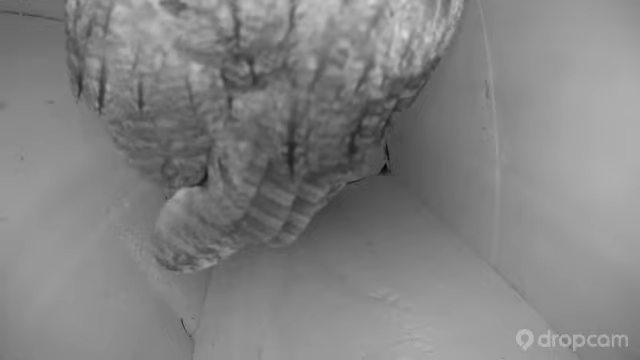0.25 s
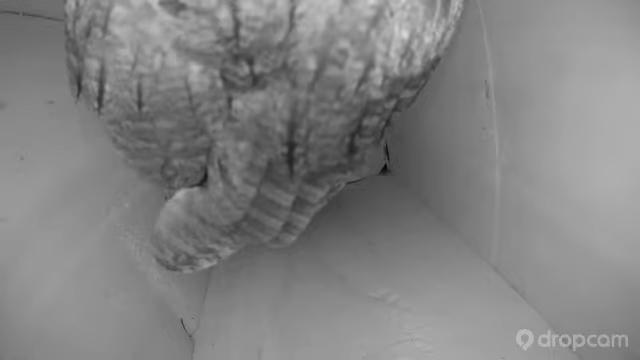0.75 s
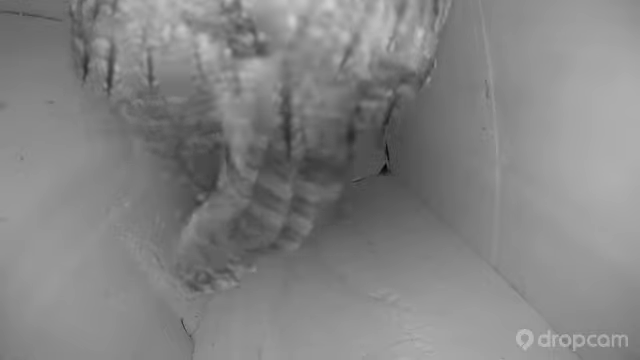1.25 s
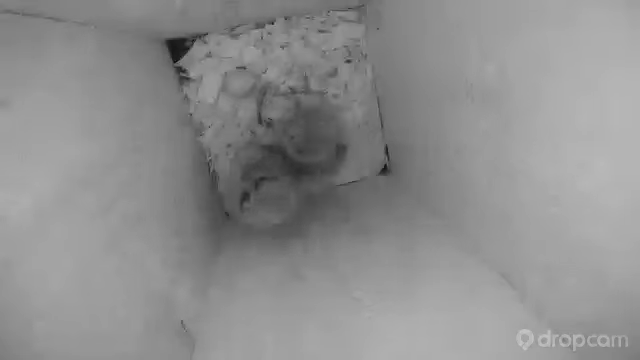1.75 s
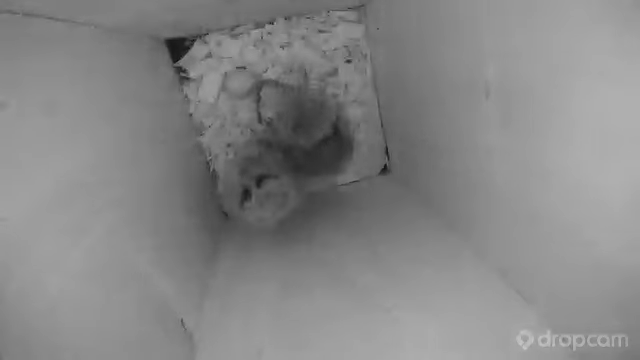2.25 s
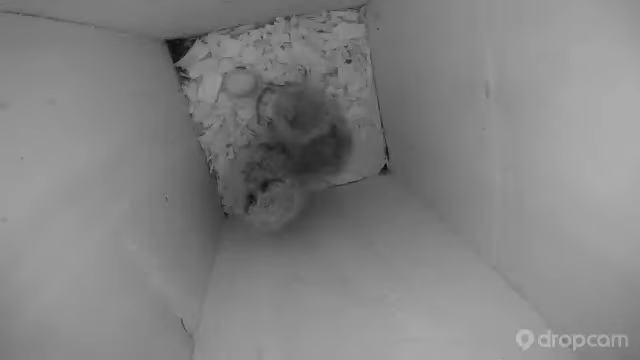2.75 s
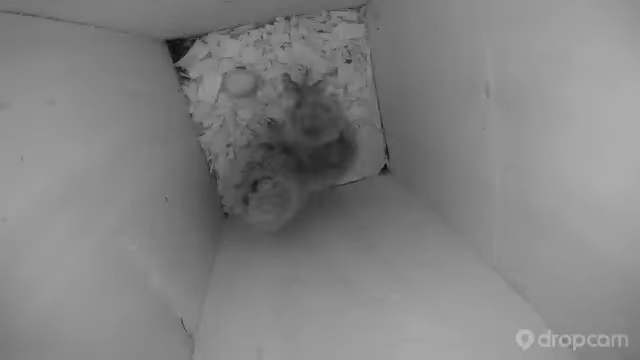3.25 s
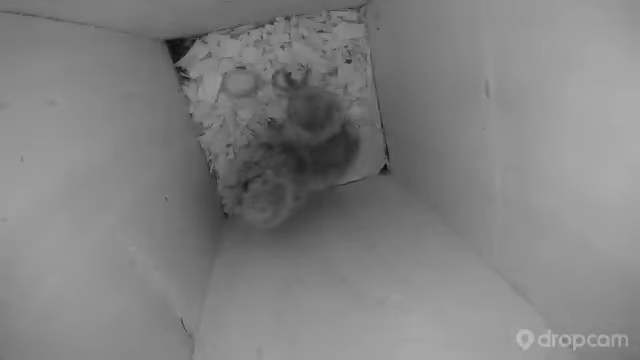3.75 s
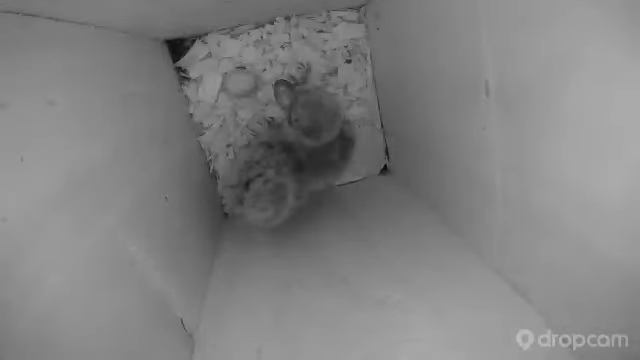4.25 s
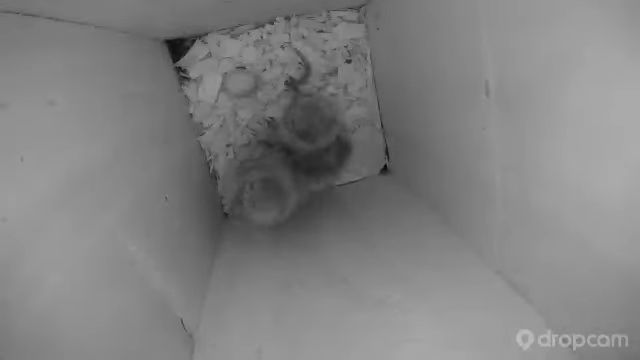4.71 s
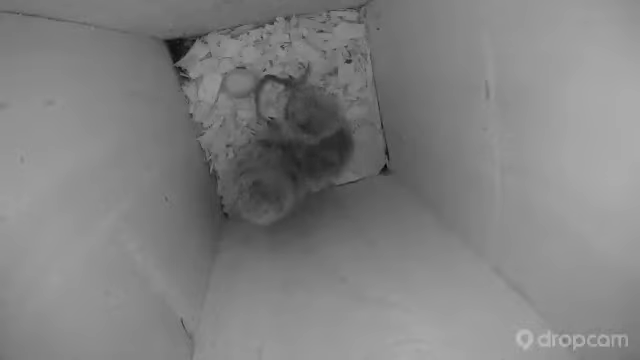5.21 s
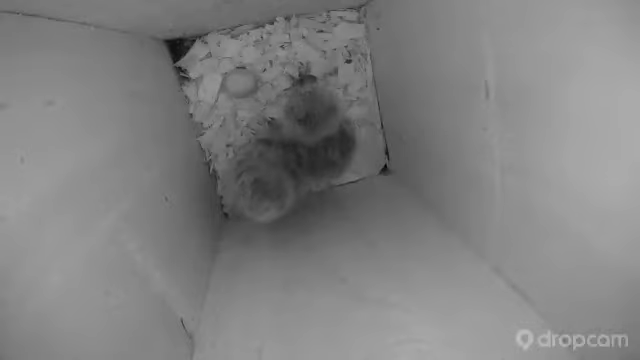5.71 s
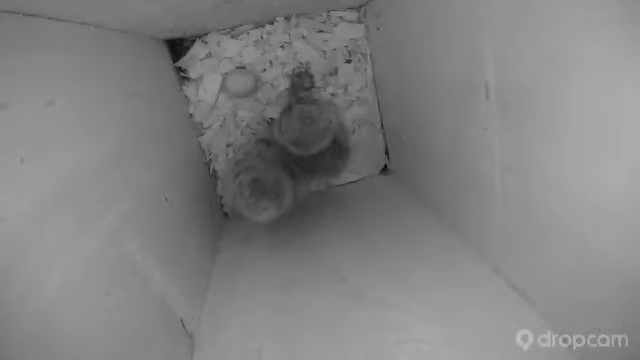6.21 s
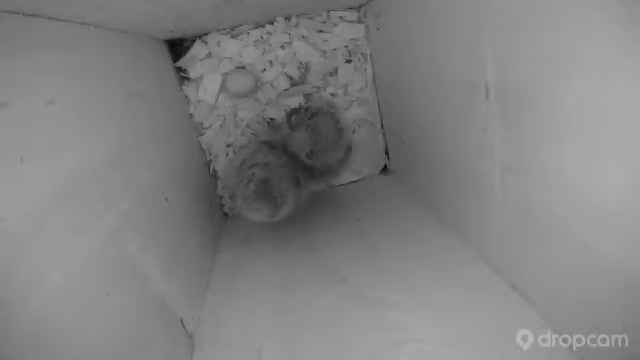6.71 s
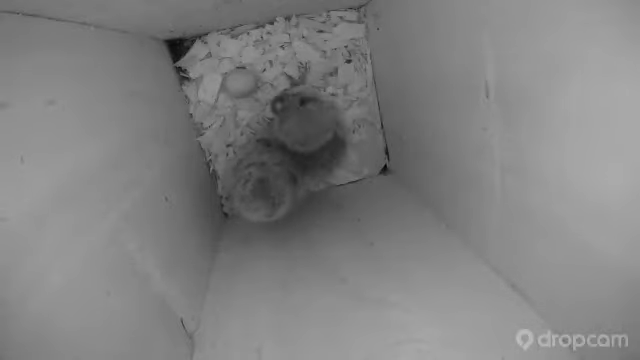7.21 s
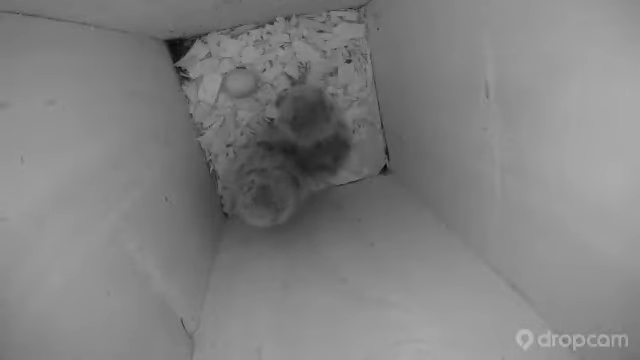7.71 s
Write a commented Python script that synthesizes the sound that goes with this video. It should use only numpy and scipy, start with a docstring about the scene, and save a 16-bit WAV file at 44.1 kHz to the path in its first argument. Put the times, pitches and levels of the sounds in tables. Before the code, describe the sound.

A faint, hollow hum and soft airy noise fill a wooden nest box throughout, heard close through a small microphone. A weak distant drone fades in the first second. At about 1.5 seconds an adult owl flaps briefly, feathers brushing the wood with a soft thump. From 2.0 to 2.6 seconds an owlet gives the loudest begging call, a breathy hiss tightening into a rasping high squeal and ending in tiny falling yelps. A softer hissing call comes from 4.7 to 5.2 seconds, finishing with a short yelp. A third runs from 7.4 to 7.8 seconds, trailing off in a few quick yelps. Between calls the chicks scratch faintly in dry wood shavings and now and then bump the walls softly. Small bill clicks come around 3.5, 4, 6.4 and 6.8 seconds, and a very faint high whine comes and goes.

```python
"""A faint hum and a fading far drone fill a wooden nest box, whose hollow resonates with outside noise.
The parent owl flaps out, brushing the entrance and thumping the air. Then owlets beg in three calls:
turbulent breath hisses and excites the box, the tightening throat turns it into a rasp and a squeal,
and short falling yelps follow. In between, claws scratch in the wood shavings, bills snap and the
birds bump the walls."""
import sys
import numpy as np
from scipy import signal
from scipy.fft import rfft, irfft
from scipy.io import wavfile
from scipy.ndimage import map_coordinates

SR = 44100
rng = np.random.default_rng(int(sys.argv[2]) if len(sys.argv) > 2 else 0)


def pcm_store(signal):
    """Save signal as 16-bit PCM."""
    levels = np.round(np.clip(np.atleast_2d(signal), -1, 1) * 32767)
    wavfile.write(sys.argv[1], SR, levels.astype(np.int16).T)


N = 351036

# begging calls: (start [s], length [s], time to a tight throat [s], hiss [dB], box resonance [dB],
# rasp [dB], squeal [dB], squeal pitch [Hz], tonal share [0-1], mouth relative to squeal [dB])
CALLS = [(1.98, 0.58, 0.55, -47.5, -43, -30.5, -29, 2405, 0.62, -20.5),
         (4.654, 0.47, 0.36, -50.5, -43.5, -49, -45, 2248, 0.23, -10),
         (7.363, 0.333, 0.37, -50.5, -46, -53, -44, 2320, 0.2, 3.5)]
# air modes of the box, lowest first: (frequency [Hz], bandwidth [Hz], gain [dB])
BOX_MODES = [(450, 63, -4.5), (1281, 65, -8.5)]


def begging():
    """Source and filter: one airflow drives hiss, rasp, squeal, the box's modes and a low rumble."""
    envelopes = [call_envelopes(*call[:7]) for call in CALLS]
    hiss_gain, box_gain, _, squeal_gain = sum(envelopes)
    beat = rattle(rate_hz=155, jitter=0.2523, depth_db=4)
    voice = breath(envelopes, beat) + box_resonance(box_gain) + squeal_gain * squeal(beat)
    rumble = undb(-15.5) * hiss_gain * unit(lowpass(noise(), hz=69))
    return voice + rumble


def call_envelopes(start, length, tight, hiss_db, box_db, rasp_db, squeal_db):
    """Constriction: a tightening throat brings in the rasp, then the squeal, and chokes the airflow."""
    age = np.clip(times() - start, 0, length)
    choked_s = np.maximum(age - tight + 0.053, 0)
    tired_s = np.maximum(age - tight, 0)
    rasp_slack = 1 - ramp(start + tight - 0.27, 0.14)
    squeal_slack = 1 - ramp(start + tight - 0.33, 0.33)
    # factors on times are slopes in dB/s; those on slack are depths in dB
    hiss = undb(hiss_db + 8.5 * age - 38.5 * choked_s)
    box = undb(box_db + 8.5 * age - 24.5 * choked_s) * ramp(start, 0.034)
    rasp = undb(rasp_db - 22 * rasp_slack - 63.5 * choked_s)
    tone = undb(squeal_db - 34.5 * squeal_slack - 13.5 * tired_s)
    # hiss and box give way to a loud squeal
    hiss /= 1 + (tone / undb(-30.5)) ** 2
    box /= 1 + (tone / undb(-38.5)) ** 2
    return burst(start, length, attack=0.0028, release=0.012) * np.array([hiss, box, rasp, tone])


def breath(envelopes, beat):
    """Turbulent hiss with ringing resonances; narrow gaps in the hiss give each call its hollow colour."""
    # turbulent hiss: (frequency [Hz], spectral level [dB])
    hiss_spectrum = [(60, -8), (330, 2), (480, 1), (570, 1.5), (750, -0.5), (1000, 2.5), (1500, -1),
                     (2100, -3.5), (2800, -9), (3800, -6.5), (5400, -11.5), (6800, -14), (7400, -43)]
    # formants of the rasping throat: (frequency [Hz], bandwidth [Hz], gain [dB])
    rasp_formants = [(2035, 130, -3), (2400, 490, -2), (2860, 220, 1), (3144, 170, 2), (3450, 260, 0.5),
                     (3770, 230, -6), (4500, 120, -12.5), (900, 510, -8.5)]
    # throat and box modes for each call's head position: (frequency [Hz], bandwidth [Hz], gain [dB])
    call_modes = [
        [(1900, 230, -6), (2090, 140, -4), (2410, 150, -3.5), (2845, 140, 2), (3110, 100, -4.5), (3446, 80, -3),
         (3600, 200, 0), (3906, 140, 3.5), (4300, 240, -6), (4640, 280, -2.5), (5000, 160, -6), (5250, 300, -2),
         (5660, 160, -12), (6460, 220, -9.5), (6880, 300, -11.5)],
        [(1774, 90, -11), (2160, 130, -9), (2450, 150, -1.5), (2817, 120, -1.5), (3110, 110, -11.5),
         (3630, 100, 3), (3920, 220, -2), (4530, 210, -1), (4930, 110, -7), (5390, 130, -7), (5700, 220, -9.5),
         (6280, 210, -8.5), (6640, 300, -11)],
        [(1770, 170, -3.5), (2130, 130, -5), (2400, 370, 2.5), (2810, 280, 1), (3120, 150, -5), (3620, 130, 0),
         (3850, 110, -8.5), (4044, 80, -10), (4540, 180, -3.5), (4930, 120, -9), (5440, 82, -10.5),
         (5770, 410, -15), (6190, 180, -15), (6630, 400, -16.5)],
    ]
    # narrow gaps in each call's hiss: (frequency [Hz], half width [Hz])
    call_gaps = [
        [(550, 16), (2320, 31), (2725, 43), (3310, 27), (4150, 55), (4840, 45), (5520, 75), (6200, 81)],
        [(2660, 36), (3470, 30), (5130, 70), (5890, 65)],
        [(1520, 24), (3350, 60), (4160, 60), (4790, 29), (5190, 85)],
    ]
    flutter = rattle(rate_hz=190, jitter=0.35, depth_db=3)
    air = noise() * rattle(rate_hz=280, jitter=0.36, depth_db=6) * undb(walk(50))
    hiss = undb(-1) * colour(air, hiss_spectrum)
    rasp = undb(-2) * unit(lowpass(ring(noise() * beat, rasp_formants), hz=4800))
    flaring = flutter * flares()
    total = 0
    for k, (hiss_gain, _, rasp_gain, _) in enumerate(envelopes):
        ringing = undb(2) * flutter * hoot(call_modes[k], waver_db=2.5)
        call = hiss_gain * (hiss + ringing) + rasp_gain * rasp + flaring * (current_call() == k)
        total = total + sag(notch(call, call_gaps[k]), *CALLS[k][:2])
    return walls(total, t60=0.06, wet_db=-1, low_hz=1700)


def flares():
    """Selective resonance: as head and tongue move, single bands of the hiss swell and fade."""
    # swelling bands: (time [s], half length [s], frequency [Hz], bandwidth [Hz], level [dB])
    bands = [(2.093, 0.02, 3950, 188, -46.5), (2.068, 0.051, 5310, 348, -50),
             (2.381, 0.024, 3230, 552, -34.5), (2.413, 0.055, 4410, 220, -49),
             (2.615, 0.013, 1900, 250, -46.5), (2.61, 0.013, 3200, 300, -51),
             (4.72, 0.031, 3970, 240, -54.5), (4.798, 0.02, 4400, 510, -52), (4.85, 0.018, 5080, 520, -50),
             (4.965, 0.023, 4500, 392, -57), (4.97, 0.024, 940, 200, -49.5), (5.125, 0.037, 910, 150, -52),
             (7.394, 0.025, 4860, 168, -57), (7.456, .035, 3670, 280, -48), (7.552, 0.17, 1274, 111, -54),
             (7.585, 0.0096, 2270, 148, -39), (7.577, 0.057, 5800, 695, -56),
             (7.66, 0.026, 5510, 200, -51.5), (7.521, 0.1, 2900, 350, -59), (7.636, 0.06, 4530, 190, -51),
             (7.66, 0.033, 3630, 170, -50), (7.76, 0.0073, 920, 160, -42.5),
             (7.808, 0.024, 895, 220, -44.5)]
    return sum(undb(db) * swell(s, half) * hoot([(hz, width, 0)]) for s, half, hz, width, db in bands)


def squeal(beat):
    """Self-oscillation of the syrinx: its pitch sags, and the mouth resonance grows as the bill opens."""
    sag_hz_per_s, opening_db_per_s = 120, 33.5
    start, length, tight, *_, pitch, tonal_share, mouth_db = np.transpose(CALLS)
    k = current_call()
    since_tight = np.clip(times() - start[k], 0, length[k]) - tight[k]
    hz = pitch[k] - sag_hz_per_s * since_tight
    syrinx = undb(1) * whistle(hz, tonal_share[k], width_hz=220, wobble=0.009) * beat
    mouth = whistle(970, tonal_share=0.15, width_hz=88, wobble=0.0092)
    return syrinx + undb(mouth_db[k] + opening_db_per_s * since_tight) * mouth


def box_resonance(gain):
    """Cavity resonance: the hiss drives the box's modes, and the lowest surges almost as a pure tone."""
    # brief hoots as the hiss catches that mode: (time [s], level [dB])
    surges = [(2.012, -36.5), (2.08, -36), (2.168, -39.5), (2.225, -44.5), (2.294, -34.5), (2.436, -41),
              (4.785, -50), (4.867, -39.5), (4.975, -48), (5.106, -49.5), (7.383, -48.5), (7.513, -45),
              (7.641, -43)]
    surge_gain = sum(undb(db) * swell(s, half_length=0.018) for s, db in surges)
    tone = whistle(450, tonal_share=0.88, width_hz=25, wobble=0.02)
    hollow = undb(-10) * tone + undb(-2.5) * hoot(BOX_MODES)
    return gain * hollow + surge_gain * tone


def yelps():
    """Downward glides of the syrinx, each with a puff that excites the throat and the box's lowest mode."""
    # yelps around the calls: (time [s], length [s], level [dB], pitch [Hz],
    # relative breath [dB], relative box resonance [dB])
    notes = [(1.976, 0.0072, -42.5, 2130, -24, -35), (2.574, 0.009, -35.5, 2450, -22, -26),
             (2.590, 0.017, -33, 2490, -28, -29), (2.608, 0.02, -35.5, 2410, -17.5, -27),
             (2.638, 0.0047, -43.5, 2480, -19, -19.5), (4.634, 0.021, -59, 2300, -8, 1),
             (5.153, 0.03, -40, 2250, -7.5, -12.5), (5.196, 0.006, -57.5, 2200, -2, -5),
             (7.363, 0.013, -44, 2400, -15, 0), (7.716, 0.025, -41, 2260, 1, 3.5),
             (7.744, 0.018, -49.5, 2230, 2.5, -27), (7.786, 0.024, -42, 2260, -3, 0),
             (7.816, 0.016, -59.5, 2165, 2, 5)]
    # formants of the yelping throat: (frequency [Hz], bandwidth [Hz], gain [dB])
    formants = [(933, 81, 2.5), (2320, 240, -5), (2730, 51, -1), (3340, 420, -6.5), (4700, 210, -8),
                (5400, 130, -13.5), (5800, 56, -11), (6300, 180, -18.5)]
    fall_hz_per_s = 3900
    puff = ring(noise(), formants)
    hollow = hoot(BOX_MODES[:1])
    glide = []
    for s, length, _, pitch, *_ in notes:
        glide += [(s, pitch), (s + length, pitch - fall_hz_per_s * length)]
    hz = np.interp(times(), *np.transpose(glide))
    tone = whistle(hz, tonal_share=0.8, width_hz=300, wobble=0.0116)
    tone *= rattle(rate_hz=480, jitter=0.31, depth_db=3)
    total = 0
    for s, length, db, _, breath_db, box_db in notes:
        envelope = undb(db) * burst(s, length * 0.95, attack=0.006, release=0.007)
        total = total + envelope * (tone + undb(breath_db) * puff + undb(box_db) * hollow)
    return total


def wings():
    """Friction and air displacement: feathers brush the entrance; each stroke hoots and thumps the box."""
    # wing strokes: (time [s], length [s], hoot [dB], thump [dB])
    strokes = [(1.496, 0.055, -48, -67), (1.593, 0.041, -41.5, -62), (1.635, 0.024, -42.5, -39.5),
               (1.679, 0.013, -37.5, -56)]
    # feather friction: (frequency [Hz], spectral level [dB])
    feather_spectrum = [(60, -10.5), (300, 1), (1000, 0.5), (1800, 1.5), (2500, -4.5), (3400, -1.5),
                        (4500, -13), (5600, -16.5), (7000, -25.5)]
    # modes of the thumped air: (frequency [Hz], bandwidth [Hz], gain [dB])
    thump_modes = [(121, 36, -6.5), (284, 22, -1.5), (1000, 94, -8)]
    peak_s, rise_db_per_s, fall_db_per_s = 1.663, 110, 332
    t = times() - peak_s
    brush_gain = undb(-43.5 + np.minimum(rise_db_per_s * t, -fall_db_per_s * t))
    total = brush_gain * colour(noise() * undb(2.9 * walk(400)), feather_spectrum)
    hollow = whistle(431, tonal_share=0.56, width_hz=35, wobble=0.028)
    thump = hoot(thump_modes)
    for s, length, hoot_db, thump_db in strokes:
        envelope = burst(s, length, attack=0.016, release=0.02)
        total += envelope * (undb(hoot_db) * hollow + undb(thump_db) * thump)
    return total


def bill_snaps():
    """Impact excitation: a bill clicks shut and rings briefly at a pitch set by how it closes."""
    # closures: (time [s], level [dB], ring frequency [Hz])
    snaps = [(1.981, -42.5, 2100), (3.479, -51.5, 4700), (3.493, -56, 3100), (3.5053, -49, 2540),
             (4.045, -56, 2930), (4.643, -43.5, 2484), (6.4437, -47.5, 2200), (6.8, -54, 2700),
             (7.72, -45, 2250)]
    # modes of the bill: (frequency [Hz], bandwidth [Hz], gain [dB])
    bill_modes = [(448, 210, -2), (850, 140, -2.5), (2020, 57, 5.5), (2200, 1050, 4.5), (2700, 1170, 5.5),
                  (3330, 550, 1.5), (4500, 410, -9), (6560, 330, -16.5)]
    click = ring(noise(), bill_modes)
    return sum(undb(db) * burst(s, 0.00079, attack=0.00079, release=0.0064)
               * (click + undb(-8.5) * sine(hz, s)) for s, db, hz in snaps)


def scratching():
    """Friction noise: dry shavings crackle in single scrapes and stir faintly as the chicks fidget."""
    # claw strokes: (time [s], level [dB], length [s])
    scratches = [(1.378, -68, 0.086), (1.42, -69.5, 0.07), (1.485, -66.5, 0.07), (1.557, -55, 0.032),
                 (1.598, -48, 0.044), (1.625, -49, 0.032), (1.715, -59.5, 0.024), (1.76, -67, 0.08),
                 (2.715, -62, 0.03), (2.734, -57.5, 0.047), (2.787, -68, 0.025), (2.994, -64.5, 0.021),
                 (3.12, -68, 0.11), (3.454, -67, 0.053), (3.781, -65.5, 0.06), (3.82, -59, 0.015),
                 (4.265, -58, 0.07), (4.327, -70.5, 0.051), (5.314, -53, 0.013), (5.33, -60, 0.028),
                 (5.813, -62, 0.07), (6.372, -67.5, 0.027), (6.407, -66, 0.015), (7.346, -55, 0.016)]
    # crackle of the shavings: (frequency [Hz], spectral level [dB])
    shavings_spectrum = [(100, -11), (450, 7), (1200, -0.5), (1800, 4), (2400, 6), (3300, 0), (4500, -5),
                         (7000, -22.5)]
    # stirring of the chicks: (time [s], level [dB])
    fidget = [(2.65, -71), (3.3, -71.5), (4.4, -75), (5.5, -77), (6.4, -76), (7.3, -81)]
    crackle = colour(noise() * undb(1.9 * walk(550)), shavings_spectrum)
    scrapes = sum(undb(db) * burst(s, length / 2, attack=0.0039, release=length * 0.49)
                  for s, db, length in scratches)
    stir = level_curve(fidget) * undb(0.79 * walk(5.5))
    return crackle * (scrapes + stir)


def bumps():
    """Damped vibration: each nudge from a moving bird rings one mode of the box."""
    # soft impacts: (time [s], level [dB], length [s], frequency [Hz])
    nudges = [(1.646, -44, 0.029, 120), (1.648, -71, 0.029, 274), (3.54, -58, 0.029, 122),
              (3.803, -53, 0.016, 442), (5.579, -56, 0.0035, 284), (7.344, -51, 0.0075, 443)]
    return sum(undb(db) * burst(s, length, attack=0.0028, release=0.007) * sine(hz, s)
               for s, db, length, hz in nudges)


def ambience():
    """Forced resonance: outside noise hums in the box, whose modes change once the entrance is clear."""
    # modes with the entrance blocked and open: (frequency [Hz], bandwidth [Hz], gain [dB])
    blocked_modes = [(420, 21, 2.5)]
    open_modes = [(123, 22, 0), (285, 35, -11), (447, 30, -2), (960, 90, -18)]
    # a faint whine that comes and goes: (time [s], level [dB])
    whine_levels = [(1.7, -68.5), (3.05, -68.5), (3.5, -71), (3.7, -77), (4.6, -78.5), (5.3, -68.5),
                    (5.8, -68), (6.0, -80), (6.9, -83), (7.25, -68.5), (7.95, -66.5)]
    # outside noise: (frequency [Hz], spectral level [dB])
    air_spectrum = [(25, -17.5), (60, -12.5), (100, -11), (170, -13), (250, -12.5), (350, -6.5), (630, -13),
                    (1000, -12.5), (1700, -16.5), (3000, -22.5), (5900, -30.5), (7000, -46)]
    opened = ramp(start=1.65, length=0.073)
    blocked_hum = (1 - opened) * undb(-70) * ring(noise(), blocked_modes)
    open_hum = opened * undb(-64 + walk(12)) * ring(noise(), open_modes)
    drone_gain = undb(-73.5) * burst(0, 0.33, attack=0.0028, release=0.19)
    far_drone = drone_gain * whistle(190, tonal_share=0.87, width_hz=4, wobble=0.0048)
    whine_gain = opened * level_curve(whine_levels) * undb(1.5 * walk(12) - 1)
    whine = whine_gain * whistle(1733, tonal_share=0, width_hz=120, wobble=0.01)
    air = undb(-66 + opened + 0.5 * walk(2.4)) * colour(noise(), air_spectrum)
    return blocked_hum + open_hum + far_drone + whine + air


def walls(x, t60, wet_db, low_hz):
    """Reverberation: close wooden walls scatter the treble into a short, dense echo."""
    t = np.arange(SR // 8) / SR
    echo = rng.standard_normal(len(t)) * np.exp(-np.log(1000) * t / t60) * (t > 0.001)
    highpass = signal.butter(4, low_hz, "high", fs=SR, output="sos")
    echo = signal.sosfilt(highpass, echo / np.linalg.norm(echo))
    return x + undb(wet_db) * signal.fftconvolve(x, echo)[:N]


def rattle(rate_hz, jitter, depth_db):
    """Amplitude modulation by the uneven beating of the syrinx, rms 1."""
    phase = np.cumsum(rate_hz * (1 + jitter * walk(rate_hz))) / SR
    return unit(undb(depth_db * np.cos(2 * np.pi * phase) * (1 + 0.5 * walk(rate_hz / 2))))


def whistle(hz, tonal_share, width_hz, wobble):
    """Line broadening: power is shared between an unsteady tone and a narrow noise band around it."""
    smear = (walk(width_hz) + 1j * walk(width_hz)) / np.sqrt(2)
    amplitude = np.sqrt(tonal_share) + np.sqrt(1 - tonal_share) * smear
    phase = 2 * np.pi * np.cumsum(hz * (1 + wobble * walk(215))) / SR
    return np.sqrt(2) * np.real(amplitude * np.exp(1j * phase))


def hoot(modes, waver_db=0, wavers_per_s=14):
    """Cascaded resonance: noise passes each mode twice for steep flanks; each may waver in level."""
    t = times()
    knots = np.arange(0, t[-1], 1 / wavers_per_s)
    total = 0
    for hz, width, db in modes:
        waver = undb(np.interp(t, knots, waver_db * rng.standard_normal(len(knots)))) if waver_db else 1
        peak = np.concatenate(signal.iirpeak(hz, hz / width, fs=SR))
        total = total + undb(db) * waver * unit(signal.sosfilt([peak, peak], noise()))
    return unit(total)


def ring(x, modes):
    """Modal superposition: parallel resonators of alternating polarity, rms 1."""
    return unit(sum((-1) ** k * undb(db) * signal.lfilter(*signal.iirpeak(hz, hz / width, fs=SR), x)
                    for k, (hz, width, db) in enumerate(modes)))


def colour(x, spectrum):
    """Minimum-phase filtering to the given spectrum, rms 1."""
    hz, db = np.transpose(spectrum)
    f = np.arange(N // 2 + 1) * SR / N
    magnitude = undb(np.interp(np.log(f + 1), np.log(hz), db))
    cepstrum = irfft(np.log(magnitude), N)
    cepstrum[1:N // 2] *= 2  # folding the cepstrum makes the filter causal
    cepstrum[N // 2 + 1:] = 0
    return unit(irfft(rfft(x) * np.exp(rfft(cepstrum)), N))


def notch(x, gaps):
    """Band-stop filtering cuts a deep, narrow gap at each frequency."""
    stops = [signal.butter(4, [hz - half, hz + half], "bandstop", fs=SR, output="sos")
             for hz, half in gaps]
    return signal.sosfilt(np.vstack(stops), x)


def sag(x, start, length, share_per_s=0.04):
    """Time warping: all frequencies of a call sink, passing their nominal values at its middle."""
    from_middle = np.clip(times() - start, 0, length) - length / 2
    warped_s = times() - share_per_s * from_middle ** 2 / 2
    return map_coordinates(x, [warped_s * SR], order=3)


def lowpass(x, hz):
    """Third-order roll-off above `hz`."""
    return signal.sosfilt(signal.butter(3, hz, fs=SR, output="sos"), x)


def current_call():
    """Index of the call that began last, at every sample."""
    starts = [call[0] for call in CALLS]
    return np.maximum(np.searchsorted(starts, times(), side="right") - 1, 0)


def burst(start, length, attack, release):
    """Envelope with a linear rise, a hold and an exponential decay."""
    return ramp(start, attack) * np.exp(-np.clip((times() - start - length) / release, 0, 20))


def swell(centre, half_length):
    """Gaussian envelope."""
    return np.exp(-np.minimum(((times() - centre) / half_length) ** 2, 20))


def ramp(start, length):
    """Linear rise from 0 to 1, then a hold."""
    return np.clip((times() - start) / length, 0, 1)


def level_curve(points):
    """Gain through (time [s], level [dB]) points, fading to silence outside their span."""
    s, db = np.transpose(points)
    inside = np.clip(1 + np.minimum(times() - s[0], s[-1] - times()) / 0.005, 0, 1)
    return undb(np.interp(times(), s, db)) * inside


def walk(rate_hz):
    """Random fluctuation band-limited to about `rate_hz`, rms 1."""
    f = np.arange(N // 2 + 1) * SR / N
    return unit(irfft(rfft(noise()) * np.exp(-(f / rate_hz) ** 2), N))


def sine(hz, start):
    """Simple harmonic motion with zero phase at `start`, rms 1."""
    return np.sqrt(2) * np.sin(2 * np.pi * hz * (times() - start))


def noise():
    """White noise."""
    return rng.standard_normal(N)


def times():
    """Time of every sample [s]."""
    return np.arange(N) / SR


def undb(db):
    """Decibels to gain."""
    return 10 ** (np.asarray(db) / 20)


def unit(x):
    """Normalisation to rms 1."""
    return x / np.sqrt(np.mean(x ** 2) + 1e-30)


def scene():
    """Superposition of all sources in the box, on one channel."""
    rustle = walls(wings() + scratching() + bill_snaps(), t60=0.04, wet_db=-7, low_hz=1500)
    return (begging() + yelps() + rustle + bumps() + ambience())[None]


def record(dry):
    """Band limiting: a small microphone loses the deep bass and the top of the treble."""
    low_hz, top_hz = 35, 7250
    thin = signal.sosfilt(signal.butter(2, low_hz, "high", fs=SR, output="sos"), dry)
    return signal.sosfilt(signal.ellip(10, 0.2, 80, top_hz, fs=SR, output="sos"), thin)


dry = scene()
out = record(dry)
pcm_store(out)
```